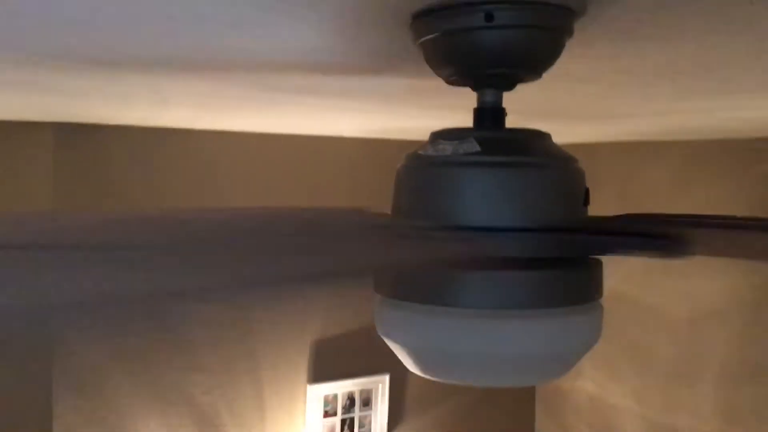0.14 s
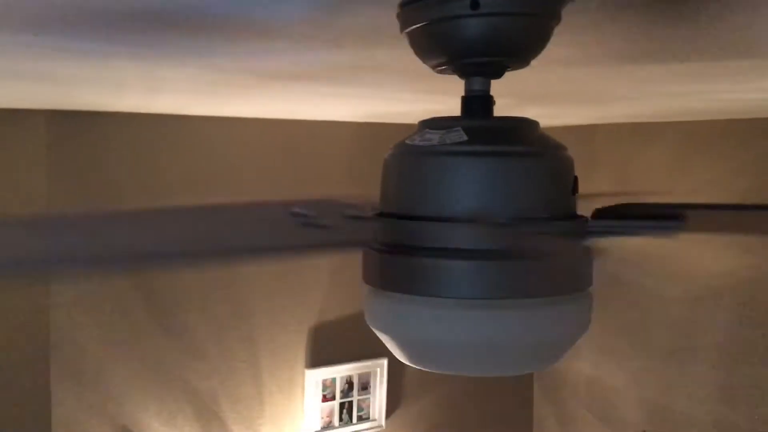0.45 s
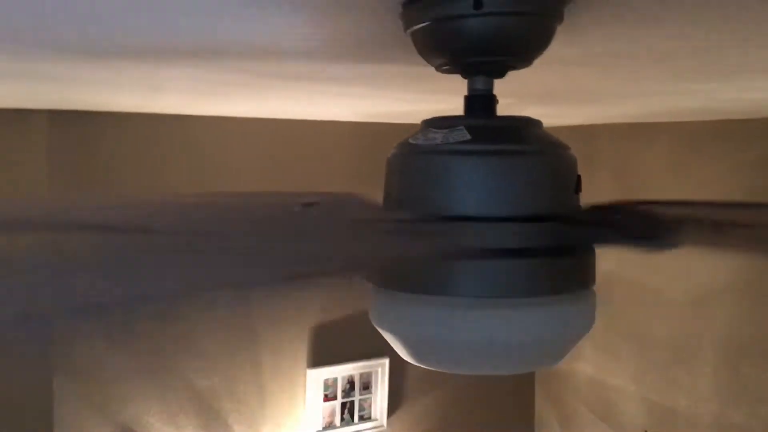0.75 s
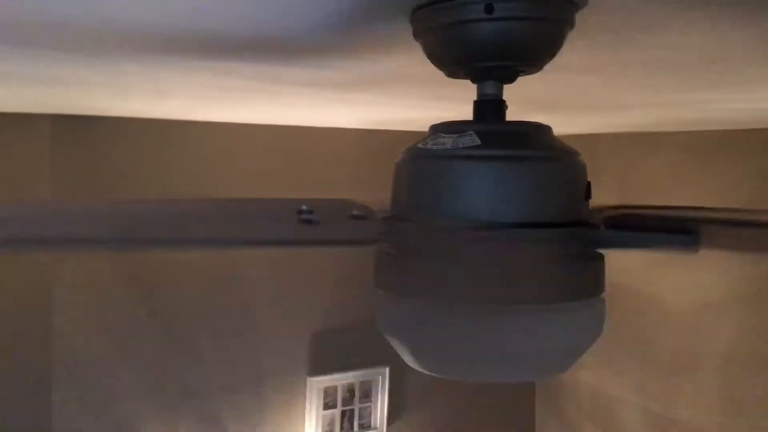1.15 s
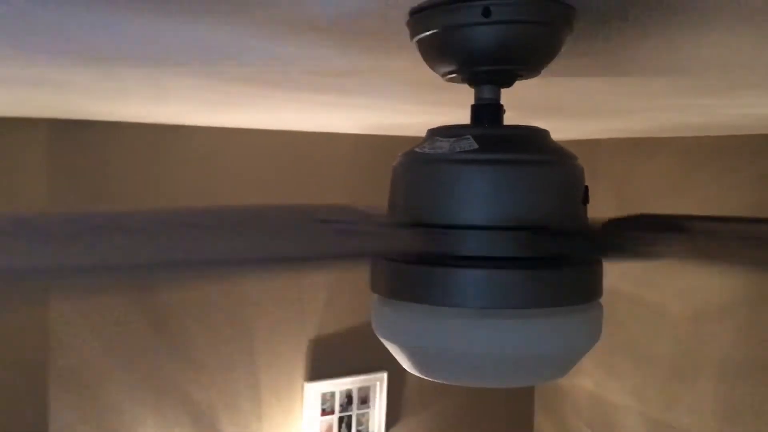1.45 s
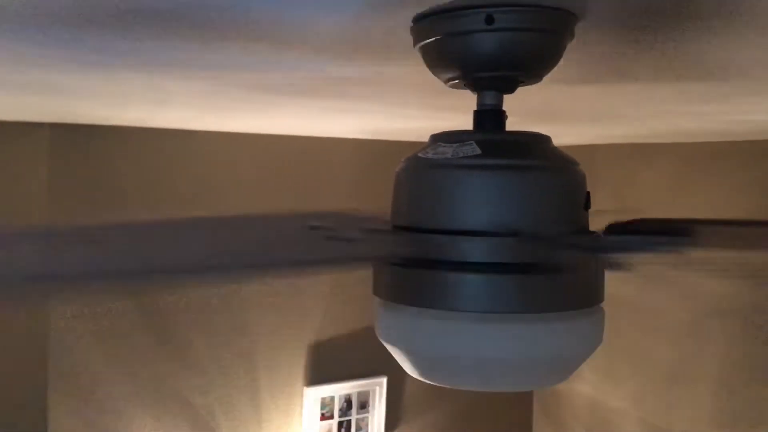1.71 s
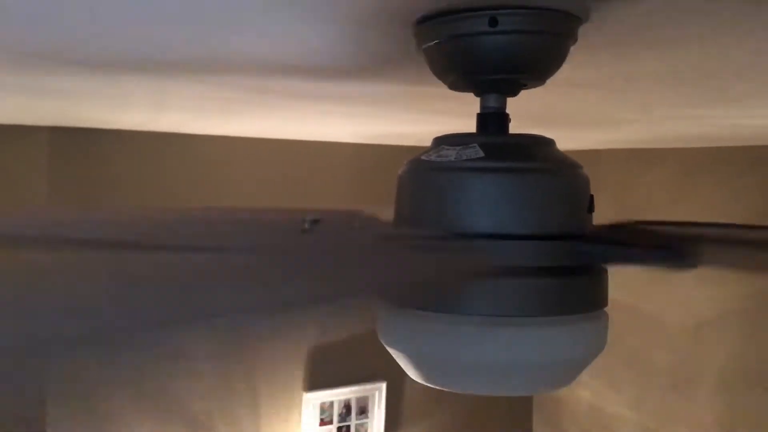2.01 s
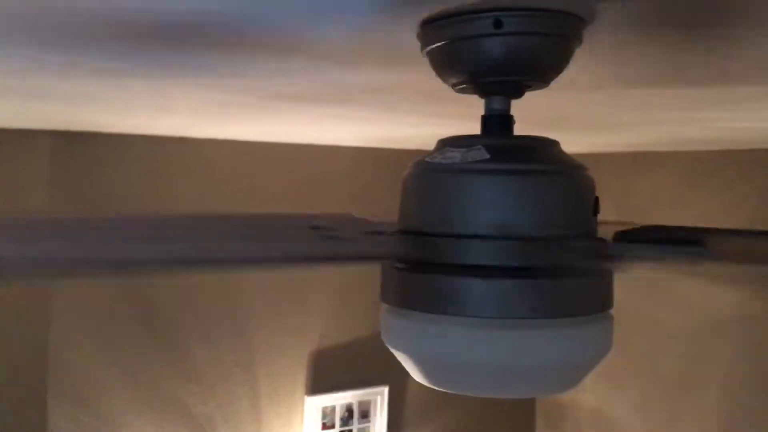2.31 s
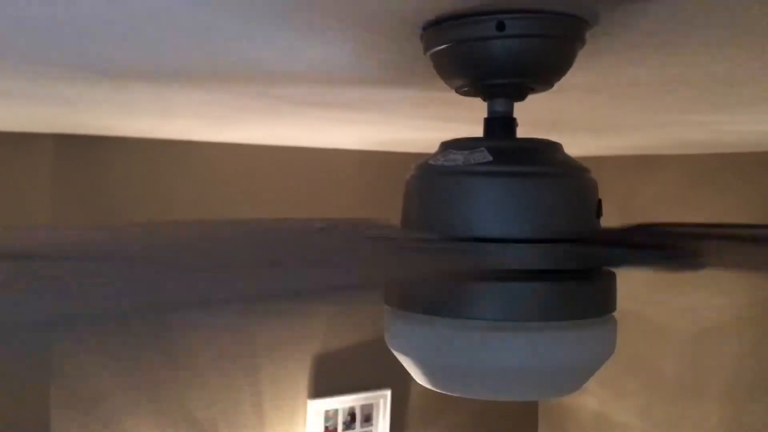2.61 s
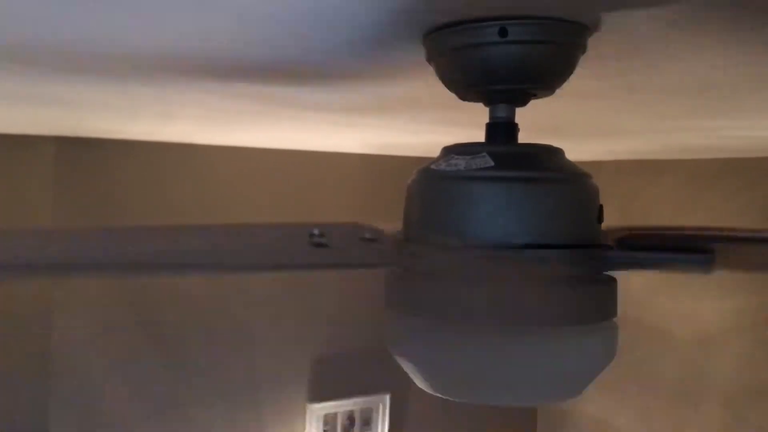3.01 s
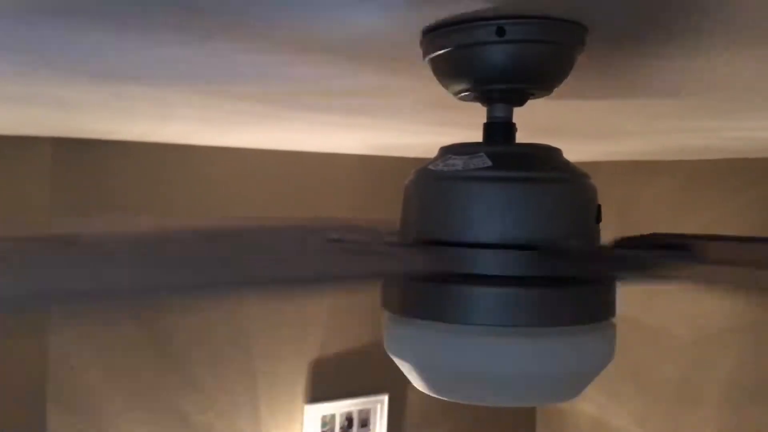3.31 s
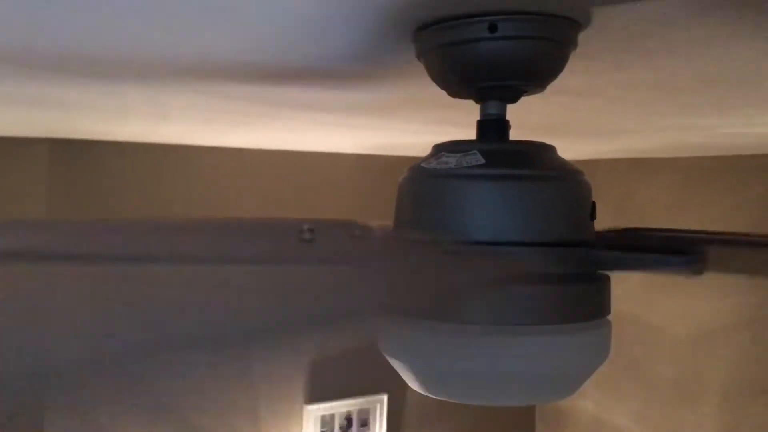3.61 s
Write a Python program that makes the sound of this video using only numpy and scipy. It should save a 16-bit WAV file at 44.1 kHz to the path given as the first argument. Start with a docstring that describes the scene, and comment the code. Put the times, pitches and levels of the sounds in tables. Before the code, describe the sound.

Ceiling fan running close by, with quick low pulsing whooshes of air, quiet rumble and mains hum

```python
"""A small room, where a ceiling fan turns steadily close to a phone.
Each passing blade brings a pressure dip and a swish of turbulent air, altered where it hits rough air.
Dips are paired bell pulses; swishes are shaped noise swelling at each pass, returned by a wall and the room.
Under them stirred air rumbles as filtered noise, the motor hums in sines on the mains,
the room resonates faintly as narrow bands of steady noise, and a thin hiss lies below."""
import sys
import numpy as np
from scipy import signal
from scipy.fft import rfft, irfft
from scipy.io import wavfile
from scipy.ndimage import uniform_filter1d

SR = 44100
rng = np.random.default_rng(int(sys.argv[2]) if len(sys.argv) > 2 else 0)


def wav_record(signal):
    """Record a signal, one row per channel, as 16-bit PCM in the file named by sys.argv[1]."""
    frames = np.transpose(np.atleast_2d(signal))
    bounded = np.clip(frames, -1, 1)
    # unit amplitude maps onto the largest positive 16-bit level
    quanta = np.round(bounded * 32767).astype(np.int16)
    wavfile.write(sys.argv[1], SR, quanta)


N = 165375

# Blade passes
PASS_HZ, FIRST_PASS_S = 11.773, 0.0742

# Pressure pulses: the push is given relative to the dip
DIP_WIDTH_S, DIP_PEAK_DB, DIP_JITTER_S = 0.0049, -33.5, 0.00072
PUSH_LEAD_S, PUSH_WIDTH_S, PUSH_REL_DB = 0.0072, 0.0036, -9

# Blade turbulence: low buffet, whoosh of smaller eddies, thin brush of the edge
BUFFET_LAG_S, BUFFET_RISE_S, BUFFET_FALL_S = 0.0033, 0.019, 0.013
BUFFET_RMS_DB, BUFFET_SCATTER_DB = -57.5, 0.53
WHOOSH_LAG_S, WHOOSH_RISE_S, WHOOSH_FALL_S = 0.004, 0.012, 0.0095
WHOOSH_RMS_DB, WHOOSH_SCATTER_DB = -63.5, 0.5
BRUSH_LEAD_S, BRUSH_RISE_S, BRUSH_FALL_S = 0.0022, 0.019, 0.011
BRUSH_RMS_DB, BRUSH_SCATTER_DB = -80, 0.5
EDDY_JITTER_S, BRUSH_JITTER_S = 0.002, 0.005

# Room: gains relative to the swish
WALL_DB, WALL_DELAY_S, WALL_LOW_HZ, WALL_HIGH_HZ = -3, 0.021, 458, 976
TAIL_DB, TAIL_DELAY_S, ROOM_T60_S = -9, 0.03, 0.52

# Steady sources
AIR_RMS_DB, AIR_FLICKER_DB = -56, 0.5
WISP_RMS_DB, WISP_FLUTTER_DB = -85, 3
HUM_HZ, HUM_WAVER_DB = 119.97, 0.5
HISS_RMS_DB = -79

# Recording band
LOW_CUT_HZ, TOP_HZ = 37.8, 15200

# Relative strength of the pressure pulses: time_s, gain_db
DIP_CONTOUR = [(0, -1), (.2, -2), (.55, -2.5), (1.3, -4), (1.45, -2), (1.65, -3), (2.2, -3), (2.7, -6.5),
               (2.85, -.5), (3.2, -2), (3.5, -1.5), (3.75, 0)]
# Relative strength of the buffeting: time_s, gain_db
BUFFET_CONTOUR = [(0, -7), (.33, 3.5), (.68, -1), (.95, -0.5), (1.3, -0.5), (1.5, -3), (2.1, 0),
                  (2.4, -4.5), (2.8, -0.5), (3.1, 1), (3.55, -1), (3.75, 1.5)]
# Relative strength of the whoosh: time_s, gain_db
WHOOSH_CONTOUR = [(0, 2.5), (.25, -13), (.35, 1.5), (.6, -2), (1.0, -2.5), (1.15, 6.5), (1.35, -0.5),
                  (1.45, 3.5), (1.77, -1.5), (1.9, 1.5), (2.15, 1.5), (2.7, 0.5), (3.0, -6.5), (3.2, 3.5),
                  (3.5, -2.5), (3.65, -5.5)]
# Blades that hit a pocket of rough air: time_s, thump_change_db, buffet_change_db,
# whoosh_change_db, brush_change_db
ROUGH_AIR = [(.415, -1.5, 1.5, 2.5, 4), (.5, -1, 3, 2, 1.5), (.669, -3.5, 3, 5, -1.5),
             (.754, 1, 2.5, -1, 3.5), (.839, -0.5, 1.5, 3.5, 3), (1.009, 5, -3.5, 2.5, 3.5),
             (1.094, 1.5, 3, 0.5, 1), (1.264, 2, 5, -1.5, 3), (1.349, -0.5, 3.5, -0.5, 0),
             (2.029, 2, -3, -5, 3), (2.113, -0.5, 3.5, 0.5, -3), (2.453, 3.5, 3, 3.5, 3.5),
             (2.538, 6, 4.5, 0, -2.5), (2.623, 3, 0.5, 2.5, -2), (2.793, 1.5, 3.5, 4, 2),
             (2.878, 0.5, 0.5, 5, 3), (3.303, 3, 1.5, -1, 4.5), (3.473, 3, 3, 3.5, 5.5),
             (3.557, 1.5, 2, 3.5, 1.5), (3.727, 0, -1, 13.5, -2)]
# Relative spectrum of large eddies in a blade's wake: frequency_hz, density_db (per Hz)
BUFFET_SPECTRUM = [(20, -18.5), (55, -3), (92, -7), (120, -2.5), (165, 1.5), (210, -2.5), (300, -13.5),
                   (600, -41.5), (1200, -63.5)]
# Relative spectrum of smaller eddies shed by a blade: frequency_hz, density_db (per Hz)
WHOOSH_SPECTRUM = [(100, -21.5), (200, -8.5), (280, 1), (390, -0.5), (440, -4.5), (510, -19), (620, -24.5),
                   (780, -39), (1500, -56)]
# Relative spectrum of air brushing over a blade's edge: frequency_hz, density_db (per Hz)
BRUSH_SPECTRUM = [(200, -33), (750, -10.5), (1100, 4), (1750, -3.5), (2700, -16.5), (4000, -16.5),
                  (7000, -30), (15000, -44)]
# Relative spectrum of stirred air in the room: frequency_hz, density_db (per Hz)
AIR_SPECTRUM = [(20, -21.5), (55, -1), (92, -8.5), (140, -6.5), (205, -8), (250, -13), (330, -13.5),
                (430, -19), (520, -22), (620, -25.5), (760, -30.5), (980, -29), (1350, -35.5), (2000, -39),
                (2600, -45.5), (6000, -75)]
# Relative spectrum of fine air fluttering round the blades: frequency_hz, density_db (per Hz)
WISP_SPECTRUM = [(300, -8.5), (560, 4.5), (850, 1), (1300, -4.5), (2100, -3), (4000, -13), (7000, -19),
                 (15000, -26)]
# Partials of the motor hum: multiple_of_hum_pitch, rms_db
HUM_PARTIALS = [(1, -65), (2, -64.5), (3, -81), (4, -79), (5, -80.5), (8, -93)]
# Resonances of the room, faint narrow bands of noise: centre_hz, half_width_hz (at half amplitude), rms_db
RESONANCES = [(288.8, 6.8, -69), (357.5, 25, -75.5), (473, 13, -80), (957, 12, -90.5), (1087, 14, -92)]
# Relative spectrum of the background hiss: frequency_hz, density_db (per Hz)
HISS_SPECTRUM = [(1500, 0), (2750, -4), (3150, 1), (4500, -2), (4900, -5.5), (5400, -2.5), (6600, -3),
                 (7600, -6.5), (8900, -5), (9900, -7), (10400, -11.5), (11100, -7.5), (15000, -10.5)]


def amp(db):
    """Logarithmic level: decibels become an amplitude gain."""
    return 10 ** (np.asarray(db) / 20)


def level(x, db):
    """Mean-square power: scale a signal to an rms level."""
    return x * amp(db) / np.sqrt(np.mean(x ** 2))


def noise(gain_at):
    """Spectral shaping: white noise is weighted by a gain that depends on frequency."""
    hz = np.maximum(np.arange(N // 2 + 1) * SR / N, 1)
    white = rng.standard_normal(N)
    return irfft(rfft(white) * gain_at(hz), N)


def coloured(spectrum):
    """Coloured noise: spectral density is interpolated along log frequency."""
    point_hz, point_db = np.array(spectrum, float).T
    return noise(lambda hz: amp(np.interp(np.log(hz), np.log(point_hz), point_db)))


def walk(rate_hz):
    """Slow modulation: random steps smoothed twice into a wander with a spread of 1."""
    step = int(SR / rate_hz)
    steps = np.repeat(rng.standard_normal(N // step + 1), step)
    wander = uniform_filter1d(uniform_filter1d(steps, step), step)[:N]
    return wander / np.std(wander)


def contour(t, table):
    """Amplitude envelope: gain interpolated in decibels between points in time."""
    return amp(np.interp(t, *np.array(table).T))


def bump(t, width_s):
    """Gaussian pulse: a smooth bell around time zero."""
    return np.exp(-0.5 * (t / width_s) ** 2)


def pass_times():
    """Periodic rotation: blades sweep past the microphone at equal intervals."""
    passes = np.arange(-1, int(N / SR * PASS_HZ) + 1)  # from one pass before the first
    return FIRST_PASS_S + passes / PASS_HZ


def pass_strengths():
    """Inflow turbulence: rough air changes thump, buffet, whoosh and brush of single passes, in dB."""
    times = pass_times()
    change_db = np.zeros((len(times), 4))
    for at, *db in ROUGH_AIR:
        change_db[np.argmin(np.abs(times - at))] = db
    return change_db.T


def pressure_dips(t):
    """Blade pressure field: a soft push ahead of each blade, then the suction under it."""
    times, thump_db = pass_times(), pass_strengths()[0]
    times = times + DIP_JITTER_S * rng.standard_normal(len(times))
    pulses = np.zeros(N)
    for at, db in zip(times, thump_db):
        push = amp(PUSH_REL_DB) * bump(t - at + PUSH_LEAD_S, PUSH_WIDTH_S)
        suction = bump(t - at, DIP_WIDTH_S)
        pulses += amp(db) * (push - suction)
    return pulses * amp(DIP_PEAK_DB) * contour(t, DIP_CONTOUR)


def blade_noise(t, spectrum, lag_s, rise_s, fall_s, scatter_db, change_db, jitter_s):
    """Modulated turbulence: noise swells as each blade nears and drops once it has gone by."""
    times = pass_times() + lag_s
    size, late = rng.standard_normal((len(times), 2)).T
    swell = np.zeros(N)
    for at, db in zip(times + jitter_s * late, change_db + scatter_db * size):
        swell += amp(db) * bump(t - at, np.where(t < at, rise_s, fall_s))
    return swell * coloured(spectrum)


def swishes(t):
    """Eddy scale: a blade's wake buffets low, its small eddies whoosh, its edge brushes thinly."""
    _, buffet_db, whoosh_db, brush_db = pass_strengths()
    buffet = blade_noise(t, BUFFET_SPECTRUM, BUFFET_LAG_S, BUFFET_RISE_S, BUFFET_FALL_S,
                         BUFFET_SCATTER_DB, buffet_db, EDDY_JITTER_S)
    whoosh = blade_noise(t, WHOOSH_SPECTRUM, WHOOSH_LAG_S, WHOOSH_RISE_S, WHOOSH_FALL_S,
                         WHOOSH_SCATTER_DB, whoosh_db, EDDY_JITTER_S)
    brush = blade_noise(t, BRUSH_SPECTRUM, -BRUSH_LEAD_S, BRUSH_RISE_S, BRUSH_FALL_S,
                        BRUSH_SCATTER_DB, brush_db, BRUSH_JITTER_S)
    buffet = level(buffet * contour(t, BUFFET_CONTOUR), BUFFET_RMS_DB)
    whoosh = level(whoosh * contour(t, WHOOSH_CONTOUR), WHOOSH_RMS_DB)
    return buffet + whoosh + level(brush, BRUSH_RMS_DB)


def room(x, t):
    """Reflection and reverberation: one wall returns the middle band, then a diffuse tail decays."""
    band = signal.butter(2, [WALL_LOW_HZ, WALL_HIGH_HZ], "band", fs=SR, output="sos")
    middle = signal.sosfilt(band, x)
    wall = amp(WALL_DB) * np.interp(t - WALL_DELAY_S, t, middle)
    decay = np.exp(-np.log(1000) * t / ROOM_T60_S)  # 60 dB down after ROOM_T60_S
    response = rng.standard_normal(N) * (t > TAIL_DELAY_S) * decay
    response /= np.linalg.norm(response)  # unit energy
    tail = irfft(rfft(x) * rfft(response), N)
    return wall + amp(TAIL_DB) * tail


def stirred_air():
    """Broadband flow noise: a slightly restless rumble with fluttering wisps above it."""
    rumble = coloured(AIR_SPECTRUM) * amp(AIR_FLICKER_DB * walk(5.4))
    wisps = coloured(WISP_SPECTRUM) * amp(WISP_FLUTTER_DB * walk(14))
    return level(rumble, AIR_RMS_DB) + level(wisps, WISP_RMS_DB)


def motor_hum(t):
    """Magnetic hum: wavering multiples of twice the mains frequency, each at a random phase."""
    hum = np.zeros(N)
    for multiple, db in HUM_PARTIALS:
        tone = np.sin(2 * np.pi * (multiple * HUM_HZ * t + rng.random()))
        hum += level(tone * amp(HUM_WAVER_DB * walk(3.8)), db)
    return hum


def room_rings():
    """Room resonance: narrow bands of steady noise."""
    rings = np.zeros(N)
    for centre_hz, half_width_hz, db in RESONANCES:
        ring = noise(lambda hz: 1 / (1 + ((hz - centre_hz) / half_width_hz) ** 2))
        rings += level(ring, db)
    return rings


def hiss():
    """Stationary noise: a thin background hiss of fixed spectrum."""
    return level(coloured(HISS_SPECTRUM), HISS_RMS_DB)


def scene():
    """Superposition: blades, room, air, motor and hiss add at one microphone."""
    t = np.arange(N) / SR
    swish = swishes(t)
    blades = pressure_dips(t) + swish + room(swish, t)
    steady = stirred_air() + motor_hum(t) + room_rings() + hiss()
    return (blades + steady)[None]


def record(dry):
    """Band limiting: the phone's bass cut makes each dip a short low wobble; the top is cut steeply."""
    bass_cut = signal.butter(4, LOW_CUT_HZ, "high", fs=SR, output="sos")
    top_cut = signal.ellip(10, 0.1, 70, TOP_HZ, fs=SR, output="sos")  # 0.1 dB ripple, 70 dB stopband
    return signal.sosfilt(top_cut, signal.sosfilt(bass_cut, dry))


dry = scene()
out = record(dry)
wav_record(out)
```